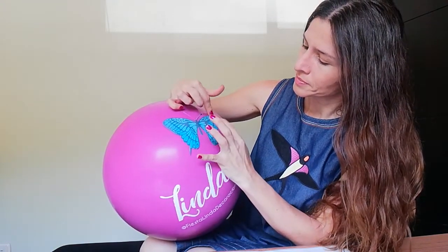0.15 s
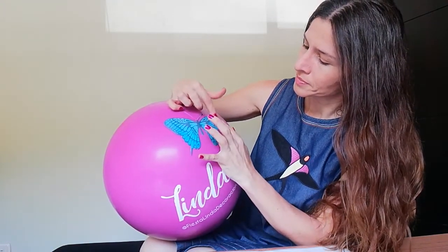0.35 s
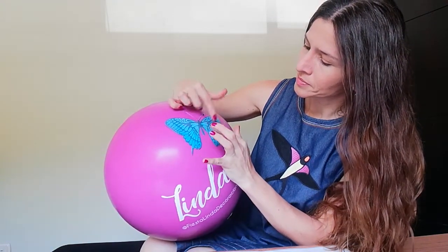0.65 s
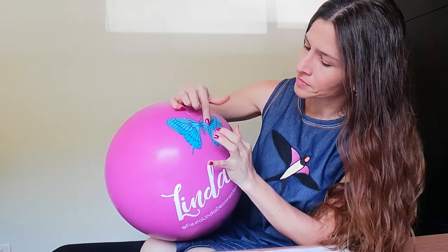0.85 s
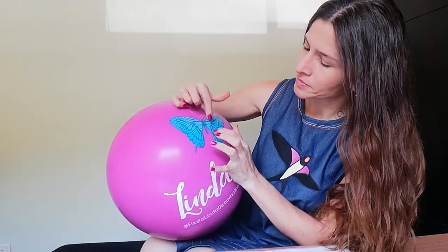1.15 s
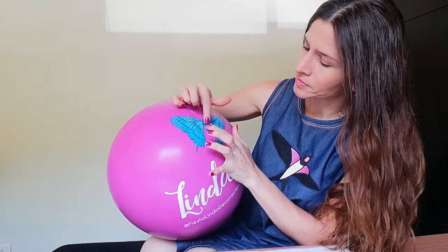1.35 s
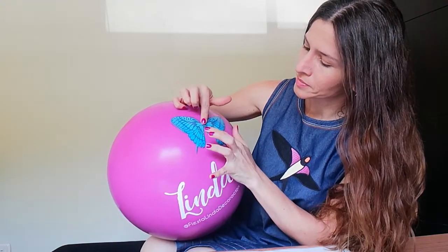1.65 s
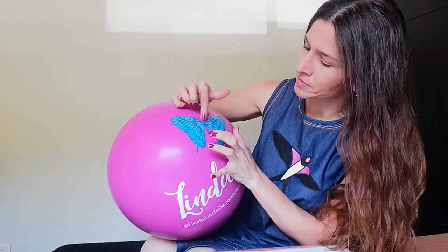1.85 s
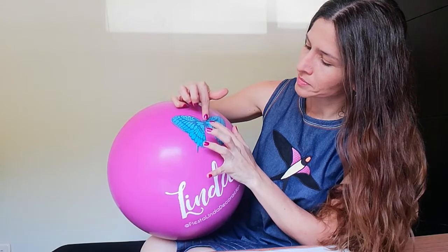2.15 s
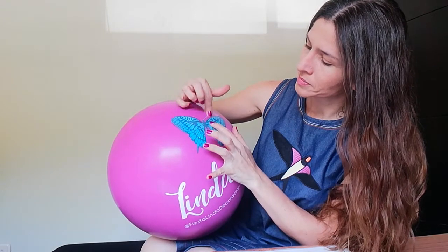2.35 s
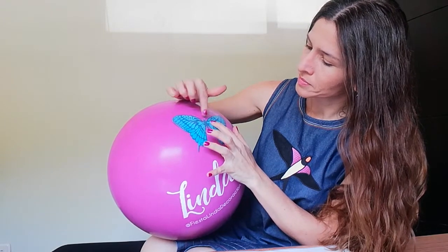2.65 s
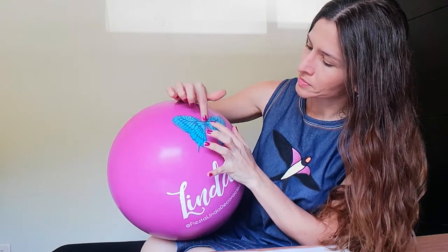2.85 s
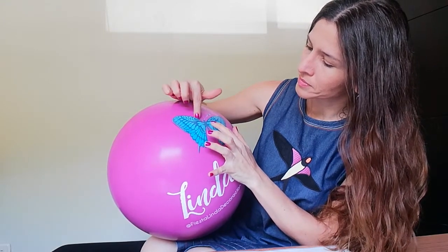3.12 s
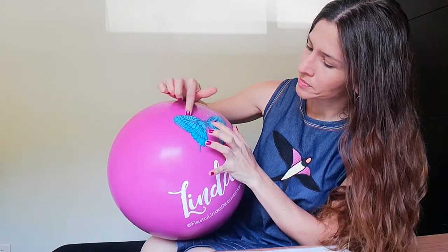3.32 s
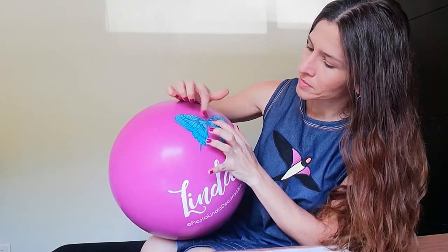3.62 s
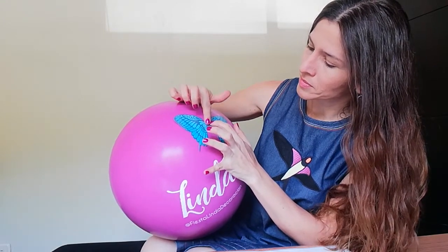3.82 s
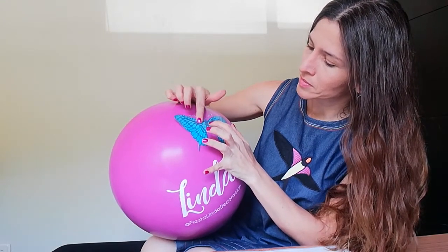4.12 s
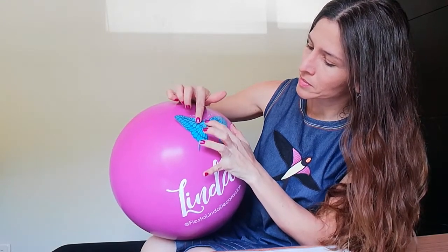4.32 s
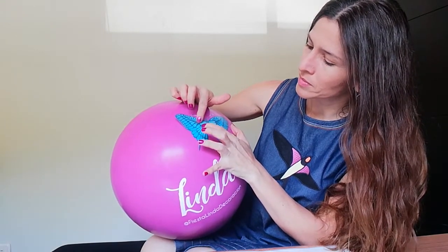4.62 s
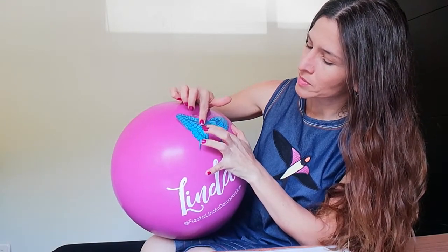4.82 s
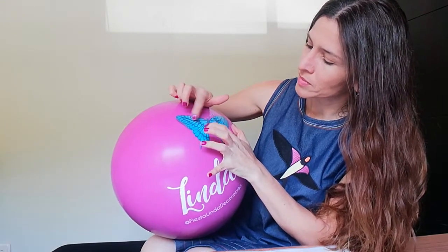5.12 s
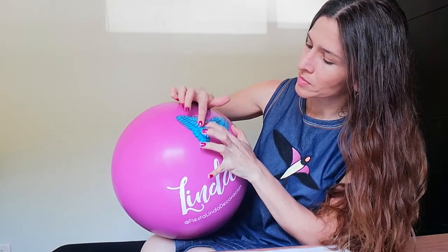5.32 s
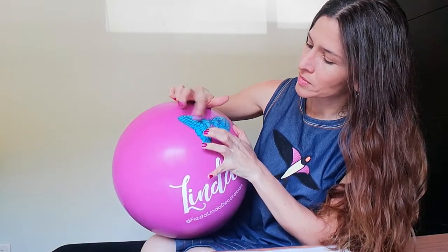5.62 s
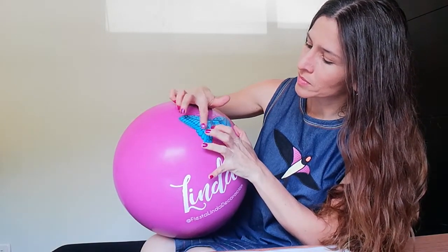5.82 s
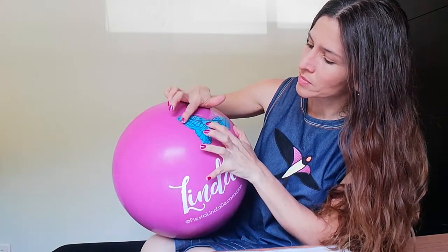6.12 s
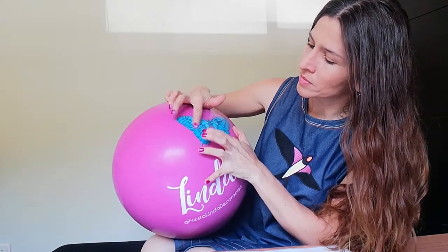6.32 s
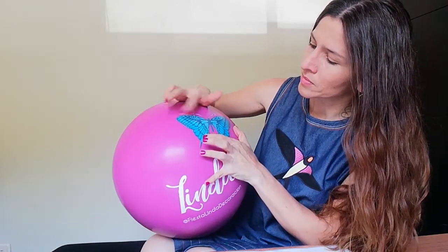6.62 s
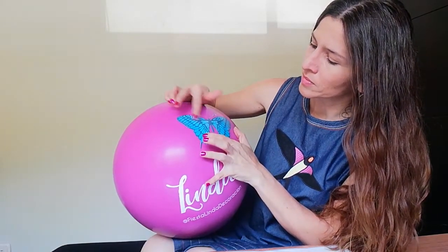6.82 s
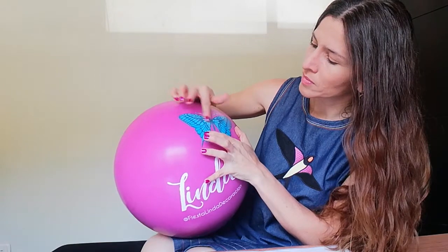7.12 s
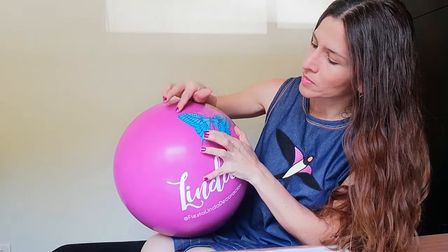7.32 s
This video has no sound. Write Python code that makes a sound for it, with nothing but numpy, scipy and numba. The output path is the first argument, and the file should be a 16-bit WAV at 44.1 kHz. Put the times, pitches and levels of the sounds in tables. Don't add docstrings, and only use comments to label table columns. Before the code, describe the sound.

Fingers press a sticker onto an inflated rubber balloon. A bright tick comes first, followed by scattered dull taps, grainy rubs and a short croaking creak, then a quiet middle with small ticks and nail clicks. The strongest moment is late: juddering low creaks, membrane thumps and a cluster of firm taps. Soft ventilation and hiss lie underneath, with a short small-room echo, heard in stereo from about a metre.

```python
import sys
import numpy as np
from scipy import signal
from scipy.fft import rfft, irfft
from scipy.io import wavfile
from scipy.ndimage import uniform_filter1d
from numba import njit

SR = 44100
rng = np.random.default_rng(int(sys.argv[2]) if len(sys.argv) > 2 else 0)


def rack_gain(trim_db):
    fader = np.asarray(trim_db, float)
    return 10 ** (fader / 20)


def to_wav(s):
    ch = np.atleast_2d(s).T
    pcm = np.round(np.clip(ch, -1, 1) * 32767)
    wavfile.write(sys.argv[1], SR, pcm.astype(np.int16))


N = 328831

# pitch in Hz, level in dB per Hz.
HUSH = [(15, -16.5), (25, -2.5), (80, -2.5), (107, -11.5), (140, -8.5), (227, -7), (331, -11.5), (483, -12),
        (1140, -14), (1240, -12), (2430, -17.5), (7940, -20.5), (15600, -29)]
HUSH_DB = -55
WHINE_HZ, WHINE_WIDTH_HZ, WHINE_DB = 14411, 25, -84
ROOM_T60_S, ROOM_DB, ROOM_WIDE_HZ = 0.209, -2.5, 215

# pitch in Hz, width in Hz, level in dB.
LAP = [(54, 34, 3), (98, 17.6, 1.5), (126, 91.3, 2), (164, 49, -4)]
MEMBRANE = [(195.7, 52.2, 2.5), (245, 38.3, 2.5), (290, 50.6, -3.5), (400, 41, -5), (525, 54, -6.5),
            (600, 78.2, -5), (690.2, 88.4, -7.5)]
INNER_AIR = [(790, 202, -0.5), (1010, 186, 5), (1376, 118, 1), (1587, 178, 0.5), (2083, 142, -7.5)]
SCRATCH = [(2620, 610, 3), (3030, 272, 4), (3626, 650, 0), (4540, 230, -1), (6180, 5730, 4.5),
           (10020, 4760, -5.5), (13300, 7800, -17)]
SHEEN = [(12130, 6800, 0)]
PEEL = [(2550, 160, -4), (3050, 300, -5), (3350, 130, 3), (6450, 400, -3.5), (5450, 900, -4),
        (7800, 200, -5), (9500, 2500, -13)]
PEEL_S, PEEL_DB, PEEL_FADE_S = .008, -29.5, 0.105
BRIGHT_HZ = 10500

# start in seconds, peak in dB, pitch in Hz, upper rings in dB relative to the main one.
TICKS = [
    (0.0084, -18.5, 7900, -28),
    (3.1193, -36, 6920, -23.5),
    (3.4424, -30, 4796, -16.5),
    (3.475, -25, 7295, -10),
    (3.6666, -37, 4102, -24),
    (4.0934, -54.5, 4900, -15.5),
    (6.4802, -45, 4470, -24),
]

# start in seconds, peak in dB, membrane pitch in Hz, relative crack in dB.
PAD_TAPS = [(0.449, -19.5, 94.4, -40), (0.4785, -28.5, 107.8, -18), (0.788, -35.5, 233.2, -22.5),
            (1.564, -44.5, 346, -19.5), (2.578, -48, 199.5, 4), (3.495, -35.5, 200, 7),
            (3.562, -33, 388.8, -9), (4.621, -45.5, 150, -3.5), (4.907, -37, 341.4, -15),
            (5.021, -33, 390.3, -10), (5.382, -38.5, 292, -12.5), (5.586, -47, 95, 2),
            (5.688, -45, 182.3, -1.5), (5.828, -33, 275, -22.5), (5.925, -30, 263, -2),
            (5.976, -19.5, 436.7, -29.5), (6.3, -39, 267.7, -27), (6.479, -18, 261.3, -1),
            (6.539, -21.5, 312.6, -10.5)]
PAD_CRACK_HZ = 636
# start in seconds, peak in dB, membrane pitch in Hz, relative crack in dB,
# crack pitch in Hz.
NAIL_TAPS = [(0.0055, -26, 187.8, 3, 3030), (0.558, -36.5, 294.8, -8.5, 926), (0.679, -39, 90, -4, 1130),
             (0.957, -27.5, 125.3, -1.5, 1160), (0.985, -26.5, 109.2, -10.5, 1390),
             (1.035, -31, 150, -7, 1800), (1.474, -54.5, 137, 12.5, 1660), (1.935, -40.5, 127.3, -12, 1380),
             (2.052, -45, 98, -11.5, 2100), (2.223, -45.5, 400, -8.5, 1340), (3.118, -50.5, 431, 12, 1170),
             (3.775, -28.5, 241.4, -5, 1010), (4.09, -35.5, 191.5, 2, 1550), (4.146, -32, 211.2, 0.5, 1520),
             (4.162, -30, 221, -8, 1000), (4.181, -32.5, 135, -3, 1300), (4.259, -39, 93, -1, 939),
             (4.37, -41, 124.2, -16, 1120), (4.944, -27, 165.6, -15, 929), (6.417, -26, 284.4, -4, 1010)]
LANDING_S = .003

# start in seconds, peak in dB, pitch in Hz.
SNAPS = [(0.0114, -19.5, 3030), (0.0222, -25, 3080), (0.0314, -22, 3250), (0.0488, -27, 3300),
         (0.0579, -28.5, 3390), (0.0721, -30.5, 3170), (0.0803, -33, 3460), (0.0887, -34.5, 3090),
         (0.6835, -43, 1156), (0.9159, -36.5, 960), (0.9352, -33.5, 980), (0.9582, -29, 1200),
         (0.9713, -31, 1310), (0.9877, -29, 1200), (0.9984, -30, 1120), (1.0149, -32.5, 1400),
         (1.4789, -46, 1550), (2.1984, -37.5, 2570), (2.2207, -38, 1420), (2.5835, -42.5, 1580),
         (3.1214, -37.5, 1540), (3.4099, -41, 980), (3.4741, -36.5, 1010), (3.5061, -25, 2950),
         (3.5148, -30, 1410), (3.5638, -35, 1560), (3.5905, -34.5, 1430), (3.7765, -35, 1160),
         (4.0944, -40, 1560), (4.152, -33.5, 1480), (4.165, -29, 1420), (4.1837, -33, 1046),
         (5.8805, -36.5, 1140), (5.9353, -31, 2100), (5.9457, -30, 1130), (5.98, -32, 1560),
         (5.9879, -29.5, 980), (6.0085, -31.5, 1010), (6.4208, -32, 1010), (6.4324, -31.5, 1060),
         (6.451, -33, 1000), (6.4859, -23, 990), (6.5084, -25.5, 1000), (6.5424, -30.5, 1270),
         (7.446, -43, 1610)]
JOLTS = [(0.0515, -33, 372), (0.4539, -31, 340.5), (0.4671, -32, 321), (0.5622, -36.5, 358.4),
         (0.7911, -41, 309.7), (0.9607, -31.5, 656), (0.9922, -30.5, 414), (1.0001, -30, 790),
         (1.0383, -37, 360), (1.0804, -38, 373), (1.5699, -38, 319), (1.8009, -30, 279.3),
         (1.8215, -28, 302), (3.4981, -31, 543), (3.5137, -33, 560), (3.565, -34, 341), (3.7773, -36, 290),
         (4.1859, -32, 370.5), (4.6228, -46, 298), (5.0279, -34, 400), (5.4506, -37, 580),
         (5.479, -38, 750), (5.4747, -34.5, 551), (5.8314, -26, 541), (5.8388, -25, 271),
         (5.8704, -20, 520), (5.8808, -22, 452), (5.8915, -17.5, 431), (5.8978, -21, 504),
         (5.9262, -12.5, 480), (5.9363, -15.5, 270), (5.9434, -16.5, 542), (5.9514, -20, 512),
         (5.9686, -20.5, 414), (5.9823, -16, 475), (5.9917, -20.5, 310), (6.0298, -25, 402),
         (6.0383, -28, 470), (6.0731, -31.5, 411), (6.4219, -25.5, 319.5), (6.4338, -26, 330),
         (6.4479, -28.5, 390), (6.4828, -15, 534), (6.5382, -21, 320), (6.5504, -26.5, 331.5),
         (6.5724, -26.5, 343),
         (0.013, -24, 300), (0.023, -26, 444), (0.045, -32, 120.5), (0.455, -28, 240), (0.466, -29, 262),
         (0.481, -30, 219), (0.489, -38, 1000), (2.16, -43.5, 280), (2.28, -47, 301), (3.73, -46.5, 500),
         (3.8, -36, 228.4), (3.83, -38.5, 240), (3.85, -42, 220), (4.62, -46.5, 500), (4.915, -37, 704),
         (4.927, -33, 505), (4.934, -32.5, 447), (4.973, -38, 331), (5.413, -39, 450), (5.5245, -35, 299.5),
         (5.644, -46, 261), (5.6905, -39, 600), (5.71, -46, 280), (6.4575, -26, 251), (6.4645, -27, 150),
         (6.499, -23, 261), (6.519, -27.5, 240), (6.586, -31.5, 220)]
FLICKS = [(0.4525, -46, 2600), (0.9157, -44, 2070), (0.9347, -40, 3800), (0.9577, -34, 2580),
          (0.9582, -38, 4700), (0.9866, -31, 2070), (0.9872, -35, 4600), (1.0225, -42, 4900),
          (1.037, -39, 2640), (1.039, -42, 5800), (1.056, -42, 3100), (3.1205, -44, 2600),
          (3.4995, -36, 2300), (3.7765, -45, 2200), (4.0933, -39, 2900), (4.1497, -36, 2910),
          (4.1626, -37, 2900), (4.181, -40, 3100), (5.927, -36, 900), (6.4198, -34, 2950),
          (6.4335, -36, 3000), (6.4505, -37, 3600), (6.4806, -27, 2800), (6.4812, -30, 3500),
          (6.4835, -30, 2050), (6.4945, -34, 3500), (6.539, -36, 3500), (6.552, -37, 3500),
          (1.8045, -46, 800), (1.8245, -46, 600), (1.866, -48, 700)]
CLICK_HZ, CLICK_S = 3280, 0.000131

# time in seconds, slip rate in Hz, level in dB,
# level of the octave in dB.
CREAK_LOW = [
    (1.74, 136.5, -66.5, -46),
    (1.77, 129.4, -30, -40),
    (1.8, 144.1, -45, -38),
    (1.824, 131, -34, -32),
    (1.846, 132.5, -34, -45),
    (1.885, 138, -62, -56),
]
CREAK_FAINT = [
    (2.14, 204.4, -65, -57),
    (2.17, 204.3, -60.5, -57),
    (2.214, 201.8, -61.5, -45),
    (2.266, 207.8, -64, -51),
    (2.31, 207.6, -68.5, -49),
]
CREAK_HIGH = [
    (5.826, 275, -25, -25),
    (5.846, 270, -27, -30),
    (5.857, 255, -41, -38),
    (5.872, 248, -24, -21.5),
    (5.898, 222, -26, -23),
    (5.915, 226, -25, -34),
    (5.94, 264, -19, -21),
    (5.962, 240, -26, -23),
    (5.985, 224, -22, -19),
]
CREAK_TAIL = [
    (6.003, 214, -19.5, -28),
    (6.02, 215, -27, -39),
    (6.045, 205, -26, -36),
    (6.065, 226, -28.5, -42),
    (6.098, 245, -31, -42),
    (6.115, 248, -52, -63),
]
LOCKED_DB = -16
STICK_S, STICK_DB = 0.00793, -7.5

# peak in seconds, membrane level in dB, time to fade 20 dB
# in seconds, relative lap thud in dB, pitch of the dent in Hz.
PRESSES = [(0.0, -31, 0.126, 0, 398.7), (0.316, -48.5, .12, 3, 200), (0.456, -33, 0.081, -2.5, 227.5),
           (0.565, -45, 0.0731, 0, 310), (0.688, -46, 0.0756, 0, 210), (0.8, -48, 0.18, 6, 249.5),
           (1.57, -40.5, 0.0672, -5, 290), (1.945, -43, 0.0551, -14.5, 305), (2.06, -52.5, 0.1446, 2, 230),
           (2.587, -46.5, 0.0644, -10, 600), (3.13, -53.5, 0.14, -3, 465), (3.67, -54, 0.28, 4, 280),
           (3.79, -42, 0.1061, 1, 231), (4.097, -45.5, 0.1042, -7.5, 259.4), (4.372, -59, 0.08, 11, 211),
           (5.03, -43, 0.1247, 0, 298.5), (5.232, -56, 0.12, 12, 226), (5.692, -46, 0.17, -5.5, 538),
           (5.59, -49, 0.13, -2.5, 290), (5.838, -27, 0.0774, -33, 404), (6.31, -44, 0.32, -11.5, 269),
           (6.424, -32, 0.2034, 4.5, 450), (6.484, -27, 0.1538, -4, 290), (7.096, -53.5, 0.05, 8, 238)]
# peak in seconds, membrane level in dB, time to swell 20 dB in seconds,
# time to fade 20 dB in seconds, pitch of the dent in Hz.
RUBS = [(0.13, -44.5, 0.24, 0.1557, 229.1), (0.95, -33.5, 0.0938, 0.1733, 232), (1.7, -51.5, .1, 0.16, 160),
        (1.835, -26, 0.0769, 0.0427, 233), (2.21, -44, 0.1547, 0.1766, 290), (2.85, -63.5, 0.17, 0.02, 235),
        (3.335, -54, .02, 0.04, 228), (3.47, -41.5, 0.0937, 0.0823, 170),
        (3.505, -34.5, 0.0506, 0.1144, 308.3), (4.19, -44, 0.0874, 0.1321, 259),
        (4.29, -42.5, 0.1457, 0.06, 198.3), (4.65, -51.5, 0.0652, 0.08, 301), (4.95, -33, .06, 0.0632, 240),
        (5.39, -44.5, 0.07, 0.11, 322), (5.475, -41.5, 0.12, 0.07, 590), (5.89, -18, 0.0522, 0.1019, 448),
        (5.984, -12.5, 0.0723, 0.0751, 399), (6.07, -25, 0.0918, 0.0476, 237.6),
        (6.35, -42, 0.07, 0.1, 255), (6.56, -36, 0.085, 0.075, 280), (6.72, -51.5, 0.17, 0.29, 338.5),
        (7.22, -51, 0.1843, 0.14, 582.5), (7.456, -36, 0.01, .05, 246)]
# peak in seconds, scratch level in dB, swell in seconds,
# fade in seconds, relative inner air level in dB.
SLIDES = [(0.012, -31, 0.012, 0.125, -11), (0.316, -53, 0.01, 0.11, -9), (0.69, -58, 0.01, 0.09, 9),
          (0.975, -45, 0.096, 0.11, 4.5), (1.04, -48, 0.05, 0.07, -6), (1.488, -51.5, 0.092, 0.058, -13),
          (1.84, -52, 0.151, 0.079, -6), (1.955, -57.5, 0.053, 0.058, 2.5), (2.065, -53, 0.027, 0.12, -14),
          (2.23, -43.5, 0.0874, 0.083, -7.5), (2.33, -50, 0.166, 0.165, -15.5),
          (2.95, -60, 0.18, 0.097, -7), (3.125, -49, .008, 0.103, -2.5), (3.25, -54, 0.18, 0.155, -16),
          (3.45, -48.5, 0.077, 0.055, -2), (3.505, -35, 0.058, .11, -6), (4.172, -47, 0.0543, 0.073, 7.5),
          (4.94, -55, 0.04, 0.11, 4), (5.486, -46.5, 0.171, 0.0884, -6.5), (5.975, -45, 0.1065, 0.1013, 6),
          (6.08, -45.5, 0.091, 0.061, -9), (6.445, -42, 0.1, 0.063, -4), (6.487, -39, 0.012, 0.123, -2),
          (6.545, -45, 0.04, 0.09, 5), (6.87, -50, 0.249, 0.158, -8.5), (7.25, -46, 0.215, 0.102, -9.5),
          (7.456, -48, 0.023, .05, -3.5)]
PRESS_S, ROUNDED = 0.0125, 1.396
RUB_LAP_DB = -6
PRESS_AIR_DB, PRESS_SCRATCH_DB, HARD_PRESS_DB = -17, -13.5, -39
# lap, membrane, inner air and scratch levels in dB.
REST_DB = (-57.5, -70.5, -70.5, -67.5)
REST_DENT_HZ = 240

TOP_HZ, OFFSET = 15600, -.001


def unit(x):
    return x / np.sqrt(np.mean(x ** 2))


def curves(tables):
    s, *columns = np.transpose(np.concatenate(tables))
    return [np.interp(np.arange(N) / SR, s, c, left=c[0], right=c[-1]) for c in columns]


def ring(x, modes):
    t = np.arange(SR // 8) / SR
    response = np.zeros(len(t))
    for k, (hz, width, db) in enumerate(modes):
        fading = np.sqrt(width) * np.exp(-np.pi * width * t)
        response += (-1) ** k * rack_gain(db) * fading * np.sin(2 * np.pi * hz * t)
    return signal.fftconvolve(x, response / np.sqrt(np.sum(response ** 2)))[:N]


def hush():
    hz = np.fft.rfftfreq(N, 1 / SR) + 1
    points = np.array(HUSH)
    shape = rack_gain(np.interp(np.log(hz), np.log(points[:, 0]), points[:, 1]))
    likeness_hz = [60, 130, 290, 640, 1400, 3000]
    likeness = [0.89, 1.0, 0.085, -0.775, 0.356, -0.095]
    alike = np.clip(np.interp(np.log(hz), np.log(likeness_hz), likeness), -.99, .99)
    mid, side = (irfft(rfft(rng.standard_normal(N)) * shape * np.sqrt(1 + c), N) for c in (alike, -alike))
    air = np.array([mid + side, mid - side]) * rack_gain(HUSH_DB) / np.std(mid)
    near_whine = np.abs(hz - WHINE_HZ) < WHINE_WIDTH_HZ / 2
    whine = unit(irfft(rfft(rng.standard_normal(N)) * near_whine, N))
    return air + rack_gain(WHINE_DB) * whine


def room(x):
    t = np.arange(int(.4 * SR)) / SR
    noise = rng.standard_normal((2, len(t)))
    dull = signal.sosfilt(signal.butter(1, 3000, fs=SR, output="sos"), noise)
    fading = dull + (noise - dull) * np.exp(-t / 0.109)
    mid, side = fading * np.exp(-np.log(1000) * t / ROOM_T60_S) * np.clip(t / 0.00144, 0, 1)
    side = signal.sosfilt(signal.butter(4, ROOM_WIDE_HZ, "high", fs=SR, output="sos"), side)
    tail = np.array([.5 * mid + side, .5 * mid - side]) / np.sqrt(np.sum(mid ** 2))
    return rack_gain(ROOM_DB) * signal.fftconvolve(x[None], tail, axes=1)[:, :N]


def ticks():
    out = np.zeros(N + SR)
    t = np.arange(SR // 40) / SR
    shape = np.clip(t / .0015, 0, 1) * np.exp(-t / .0032)
    for s, db, hz, top_db in TICKS:
        top = rack_gain(top_db)
        shares = [(.66, 0.326), (1, 0.7), (1.32, top), (1.6, top), (1.95, top)]
        rings = sum(g * np.sin(2 * np.pi * min(hz * r, .33 * SR) * t) for r, g in shares)
        flutter = 1 + 2.4 * uniform_filter1d(rng.standard_normal(len(t)), size=8)
        start = int(s * SR)
        out[start:start + len(t)] += rack_gain(db - 5.5) * rings * flutter * shape
    return out[:N]


def all_taps():
    return sorted([(*tap, PAD_CRACK_HZ) for tap in PAD_TAPS] + NAIL_TAPS)


def taps():
    out = np.zeros(N + SR)
    t = np.arange(SR // 6) / SR
    strengths = [0.506, 0.558, 0.334, 0.263]
    for s, db, hz, crack_db, crack_hz in all_taps():
        ratios = np.array([1, 1.3, 1.9, 0.87]) * (.95 + 0.1698 * rng.random(4))
        tones = np.zeros(len(t))
        for ratio, strength in zip(ratios, strengths):
            tones += strength * np.sin(2 * np.pi * hz * ratio * t) * np.exp(-t * ratio / 0.0212)
        burst = rng.standard_normal(len(t)) * (np.exp(-t / 0.0036) + 0.3 * np.exp(-t / 0.07))
        modes = MEMBRANE[4:] + INNER_AIR + SCRATCH[:4]
        near = [(f, w, d - 6.54 * abs(np.log2(f / crack_hz))) for f, w, d in modes]
        crack = ring(burst, near)[:len(t)]
        crack = rack_gain(crack_db - 0.05) * crack / np.abs(crack).max()
        start = int((s + LANDING_S) * SR)
        out[start:start + len(t)] += rack_gain(db - 2.4) * (tones + crack)
    return out[:N]


def releases(table, turns, rise_turns, click_db, gain_db):
    out = np.zeros(N + SR)
    t = np.arange(SR // 20) / SR
    click = np.sin(2 * np.pi * CLICK_HZ * t) * np.exp(-t / CLICK_S)
    for s, db, hz in table:
        swing = np.exp(-t * hz / turns) * (1 - np.exp(-t * hz / rise_turns))
        body = np.sin(2 * np.pi * hz * t) * swing
        start = int(s * SR)
        out[start:start + len(t)] -= rack_gain(db + gain_db) * (body + rack_gain(click_db) * click)
    return out[:N]


def creak(tables, third_db, slope_db, wander, patchy_db):
    hz, db, octave_db = uniform_filter1d(curves(tables), size=250)
    t = np.arange(N) / SR
    drift = []
    for _ in range(4):
        smooth = uniform_filter1d(rng.standard_normal(N), size=300)
        drift.append(unit(uniform_filter1d(smooth, size=300)))
    phase = 2 * np.pi * np.cumsum(hz * (1 + wander * drift[0])) / SR
    upper = [octave_db + third_db + slope_db * k for k in range(5)]
    tone = np.zeros(N)
    for k, level in enumerate([db, octave_db, *upper]):
        tone += rack_gain(level + patchy_db * drift[k % 3 + 1]) * np.sin((k + 1) * phase)
    start_s, end_s = tables[0][0][0], tables[-1][-1][0]
    return tone * np.clip(np.minimum(t - start_s, end_s - t) / 0.009, 0, 1)


def grip():
    t = np.arange(N) / SR
    landings = np.sort([*(np.array(all_taps())[:, 0] + LANDING_S), *np.array(SNAPS)[:, 0]])
    following = np.minimum(np.searchsorted(landings, t), len(landings) - 1)
    wait = landings[following] - t
    stuck = rack_gain(STICK_DB * np.clip(1 - wait / STICK_S, 0, 1) ** .5 * (wait > 0))
    spans = [(CREAK_LOW[0][0], CREAK_LOW[-1][0]), (CREAK_HIGH[0][0], CREAK_TAIL[-1][0])]
    locked = rack_gain(LOCKED_DB * sum((t > a) & (t < b) for a, b in spans))
    return stuck, locked


def swells(t, peak_s, swell_s, fade_s):
    ahead = t - peak_s[:, None]
    away = np.where(ahead < 0, -ahead / np.reshape(swell_s, (-1, 1)), ahead / fade_s[:, None])
    return rack_gain(-20 * away ** ROUNDED) ** 2


def power(db):
    return rack_gain(db) ** 2


def hands():
    t = np.arange(0, N / SR, .001)
    press_s, press_db, press_fade, lap_db, press_hz = np.transpose(PRESSES)
    rub_s, rub_db, rub_swell, rub_fade, rub_hz = np.transpose(RUBS)
    slide_s, slide_db, slide_swell, slide_fade, air_db = np.transpose(SLIDES)
    press = swells(t, press_s, PRESS_S, press_fade)
    rub = swells(t, rub_s, rub_swell, rub_fade)
    slide = swells(t, slide_s, slide_swell, slide_fade)
    drag = power(np.minimum(press_db, HARD_PRESS_DB)) @ press
    lap = power(press_db + lap_db) @ press
    lap = lap + power(np.minimum(rub_db, HARD_PRESS_DB) + RUB_LAP_DB) @ rub
    skin = power(press_db) @ press + power(rub_db) @ rub
    air = power(slide_db + air_db) @ slide + power(PRESS_AIR_DB) * drag
    scratch = power(slide_db) @ slide + power(PRESS_SCRATCH_DB) * drag
    layers = np.array([lap, skin, air, scratch]) + power(np.array(REST_DB))[:, None]
    pitch = (power(press_db) * press_hz) @ press + (power(rub_db) * rub_hz) @ rub
    pitch = (pitch + power(REST_DB[1]) * REST_DENT_HZ) / layers[1]
    return [np.interp(np.arange(N) / SR, t, c) for c in [*(10 * np.log10(layers)), pitch]]


def slips(per_s, spread_db, smooth):
    happens = rng.random(N) < per_s / SR
    size = np.minimum(rng.exponential(size=N), 3)
    sign = np.sign(rng.standard_normal(N))
    return unit(happens * rack_gain(spread_db * size) * sign + smooth * rng.standard_normal(N))


@njit
def dent(x, hz, damping):
    y, band, low = np.empty(len(x)), 0., 0.
    for i in range(len(x)):
        g = np.tan(np.pi * hz[i] / SR)
        v = (band + g * (x[i] - low)) / (1 + g * (g + damping))
        band = 2 * v - band
        low = low + 2 * g * v
        y[i] = damping * v
    return y


def peeling(fine):
    since = np.arange(N) / SR - PEEL_S
    level = rack_gain(PEEL_DB - 20 * np.abs(since / PEEL_FADE_S) ** ROUNDED)
    peel = ring(fine * (since > 0) * level, PEEL)
    return signal.sosfilt(signal.butter(4, BRIGHT_HZ, fs=SR, output="sos"), peel)


def rubbing():
    lap_db, skin_db, air_db, scratch_db, dent_hz = hands()
    stuck, locked = grip()
    coarse = rack_gain(0.62) * stuck * slips(per_s=600, spread_db=4.0, smooth=0.453)
    fine = rack_gain(0.67) * stuck * slips(per_s=1800, spread_db=3.6, smooth=1.1)
    lap = ring(coarse * rack_gain(lap_db - 5.5), LAP)
    membrane = ring(coarse * locked * rack_gain(skin_db - 5), MEMBRANE)
    dented = dent(coarse * locked * rack_gain(skin_db + 16), dent_hz, 0.0873)
    sheen = ring(fine * rack_gain(0.286 * skin_db - 59.5), SHEEN)
    air = ring((0.685 * coarse + 0.857 * fine) * rack_gain(air_db - 0.5), INNER_AIR)
    scratch = ring(fine * rack_gain(scratch_db - 5), SCRATCH)
    return lap + membrane + dented + sheen + peeling(fine) + air + scratch


def scene():
    low = creak([CREAK_LOW], third_db=-15, slope_db=-1.5, wander=0.025, patchy_db=4.0)
    faint = creak([CREAK_FAINT], third_db=-32, slope_db=-4, wander=0.0477, patchy_db=3.0)
    high = creak([CREAK_HIGH, CREAK_TAIL], third_db=-15, slope_db=-5, wander=0.018, patchy_db=1.8) * rack_gain(-1.5)
    balloon = rubbing() + low + faint + high + ticks() + taps()
    balloon = balloon + releases(SNAPS, turns=2.4, rise_turns=0.033, click_db=-6, gain_db=-0.34)
    balloon = balloon + releases(FLICKS, turns=3.2, rise_turns=0.15, click_db=-8, gain_db=1.5)
    balloon = balloon + releases(JOLTS, turns=2.3, rise_turns=0.338, click_db=-30, gain_db=-1.48)
    left, right = balloon * rack_gain([[-1.2], [1.2]]) * rack_gain(0.5) + room(balloon)
    mid = signal.sosfilt(signal.butter(4, 45, "high", fs=SR, output="sos"), left + right) / 2
    side = signal.sosfilt(signal.butter(2, 165, "high", fs=SR, output="sos"), left - right) / 2
    return np.array([mid + side, mid - side]) + hush()


def low_pass(x):
    return signal.sosfilt(signal.butter(12, 15710, fs=SR, output="sos"), x)


def record(dry):
    cut = signal.sosfilt(signal.ellip(8, .2, 70, TOP_HZ, fs=SR, output="sos"), dry)
    return low_pass(cut + OFFSET)


dry = scene()
out = record(dry)
to_wav(out)
```